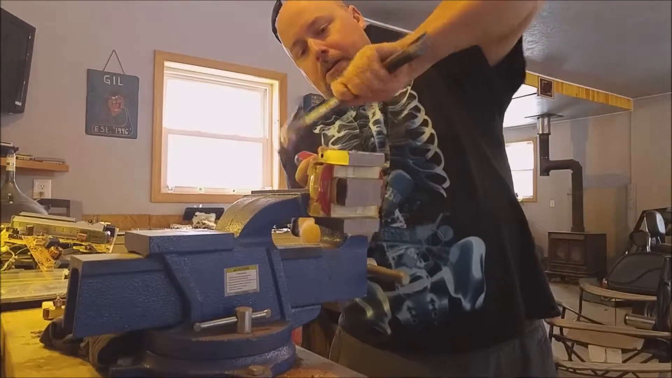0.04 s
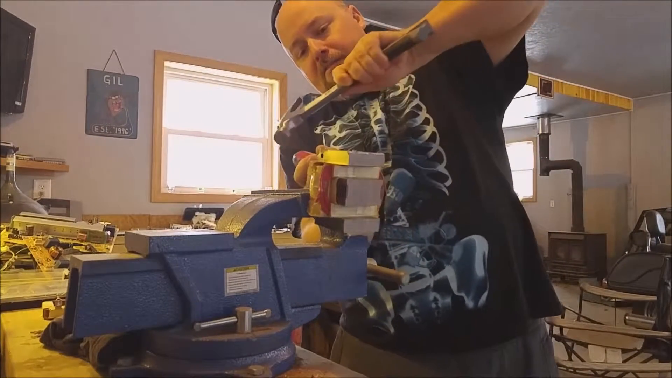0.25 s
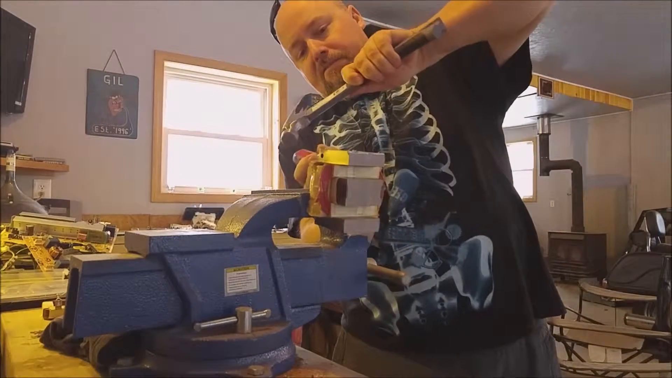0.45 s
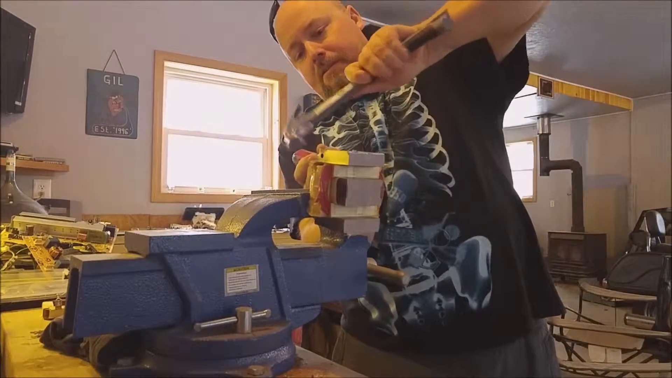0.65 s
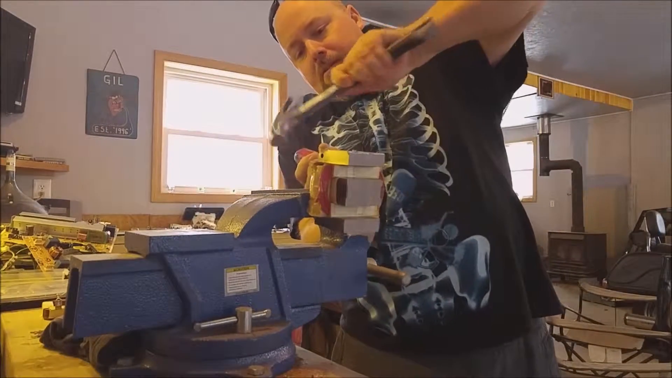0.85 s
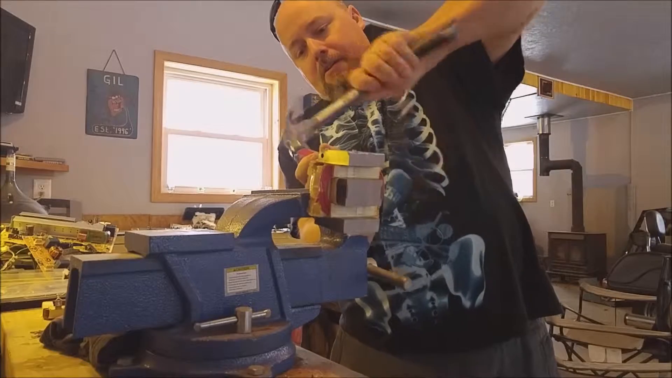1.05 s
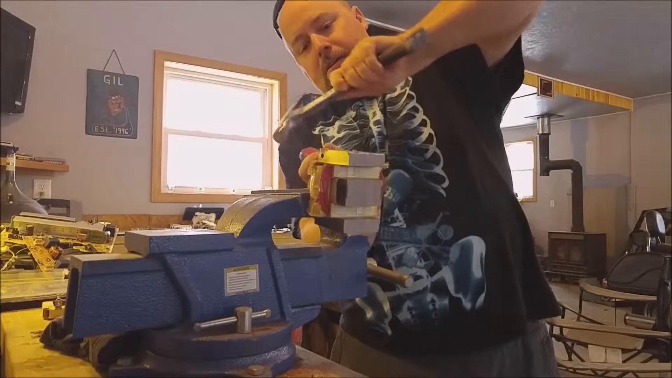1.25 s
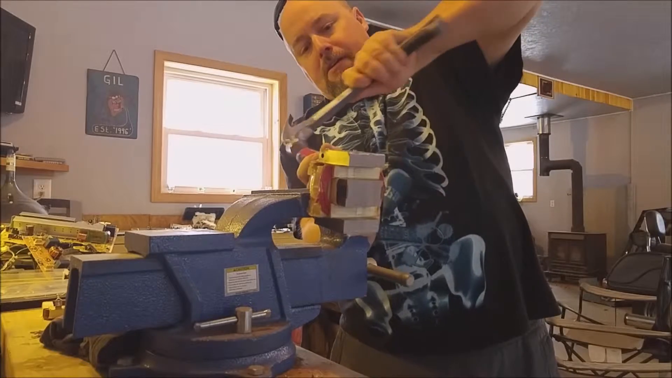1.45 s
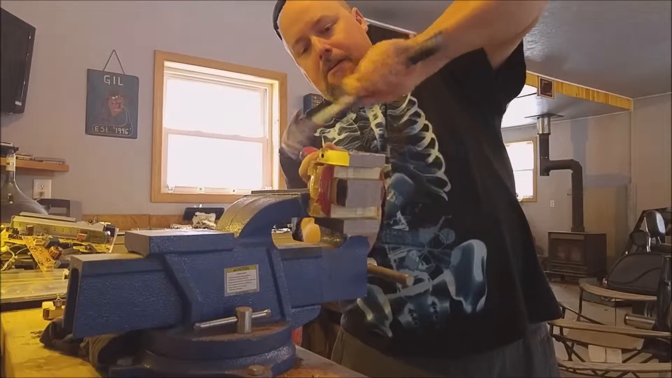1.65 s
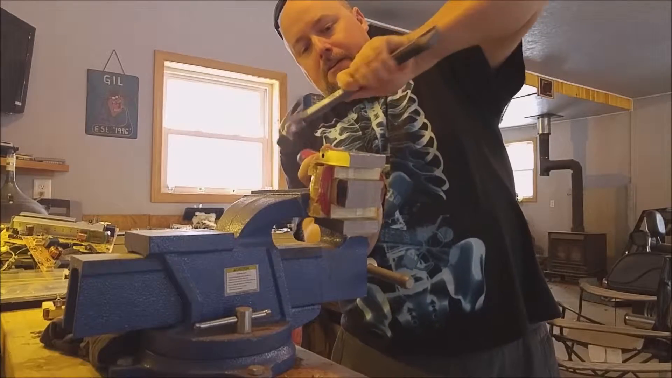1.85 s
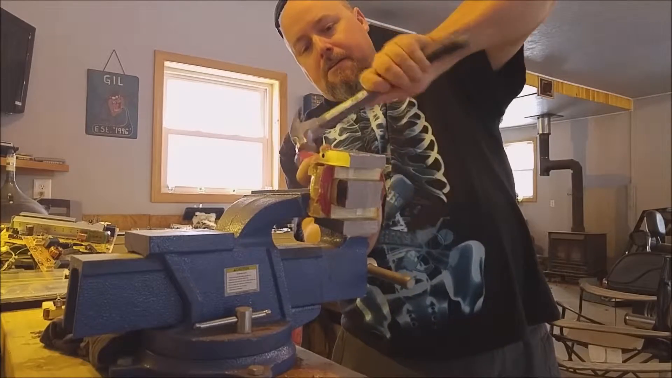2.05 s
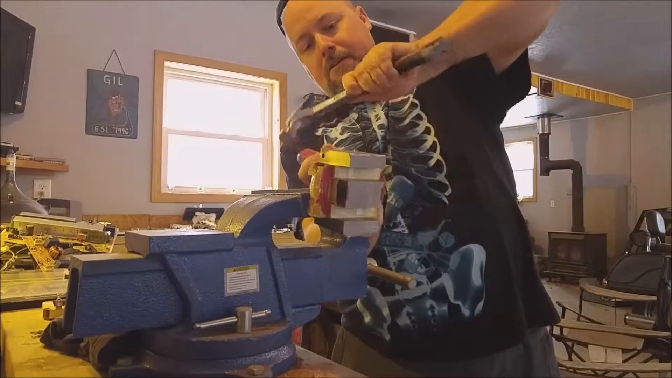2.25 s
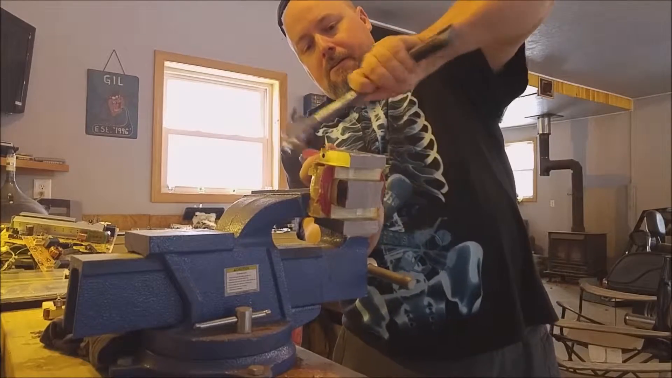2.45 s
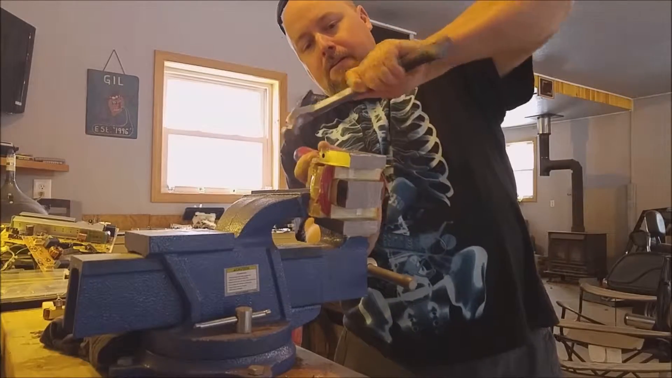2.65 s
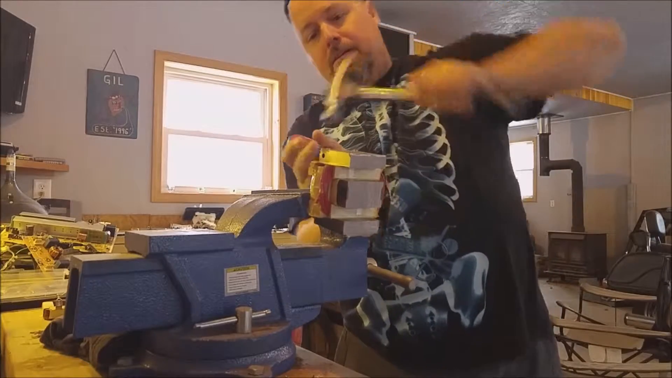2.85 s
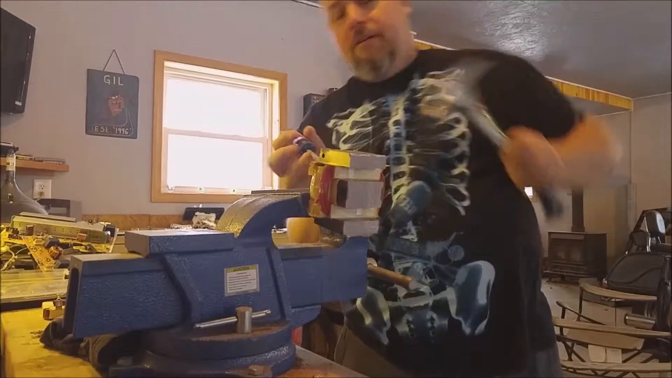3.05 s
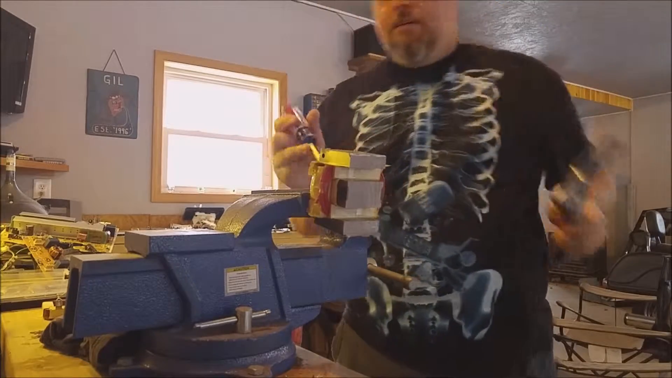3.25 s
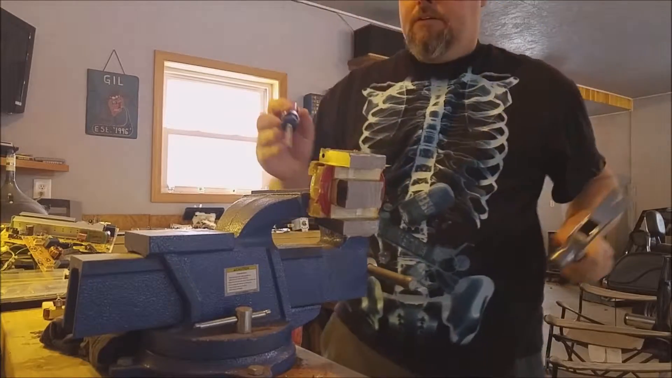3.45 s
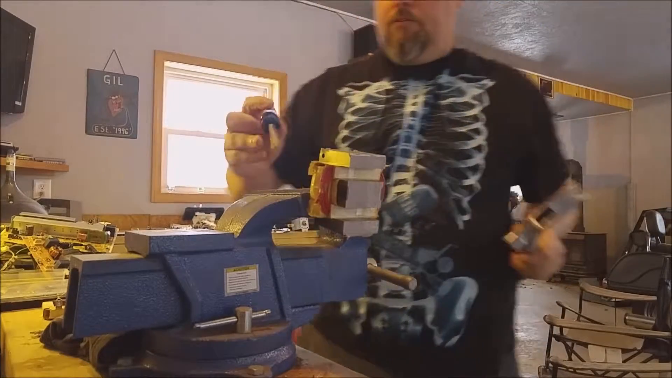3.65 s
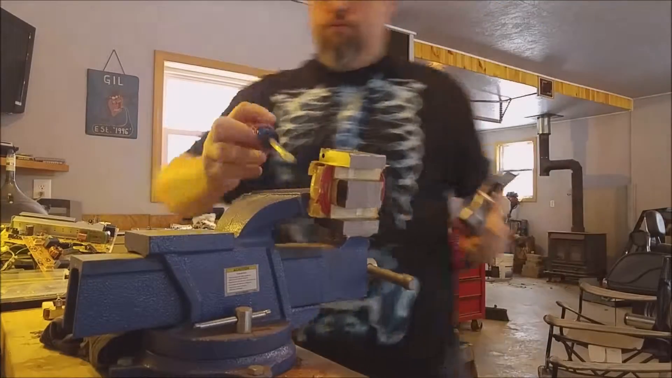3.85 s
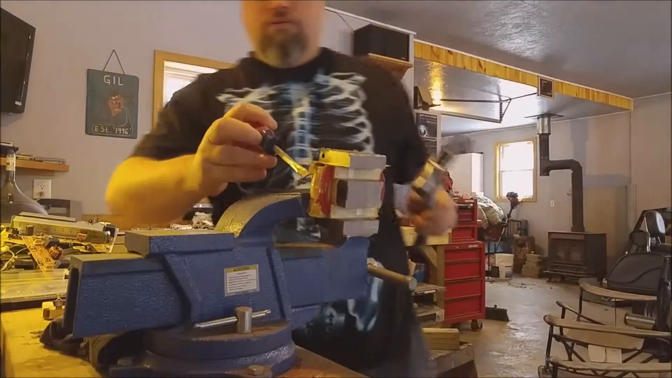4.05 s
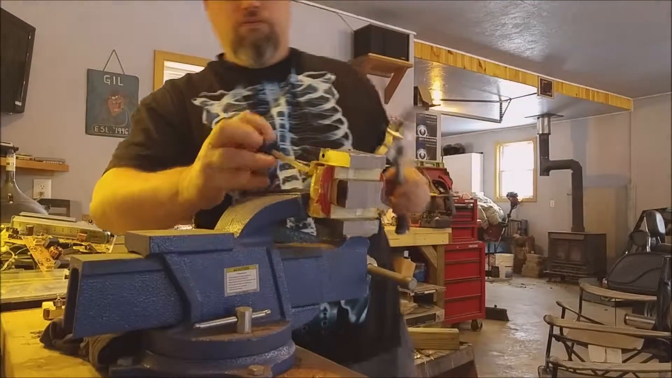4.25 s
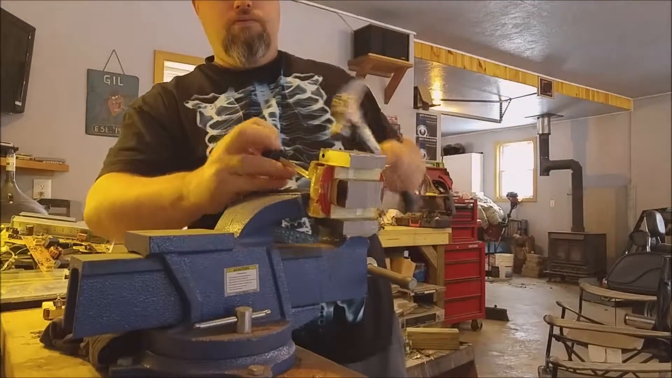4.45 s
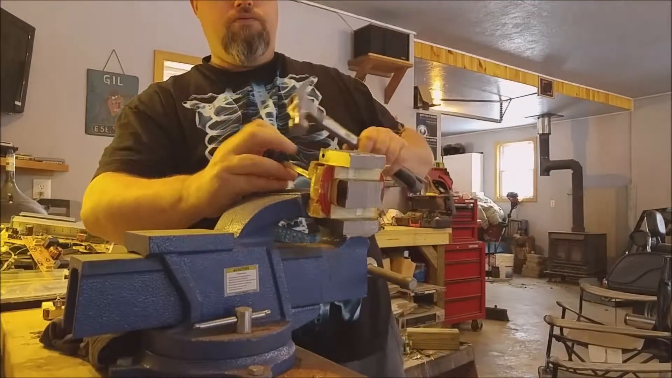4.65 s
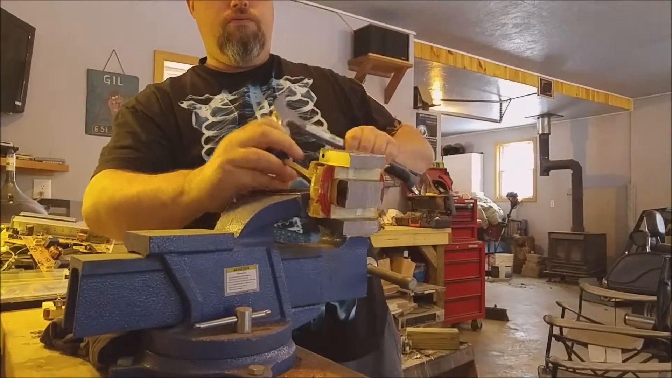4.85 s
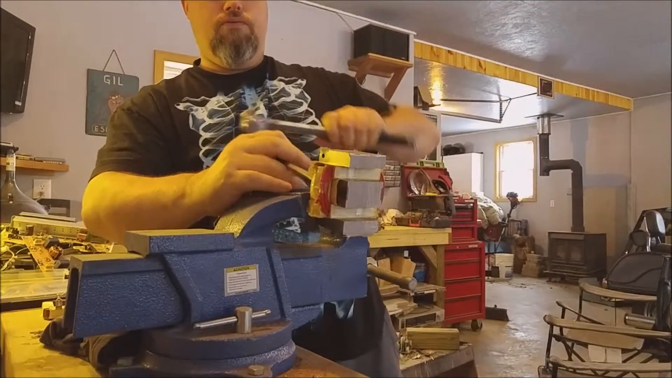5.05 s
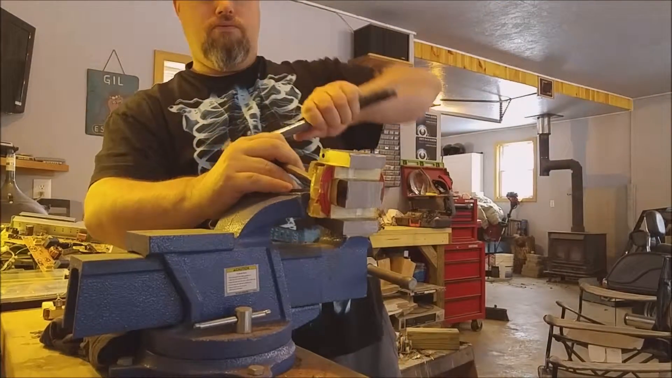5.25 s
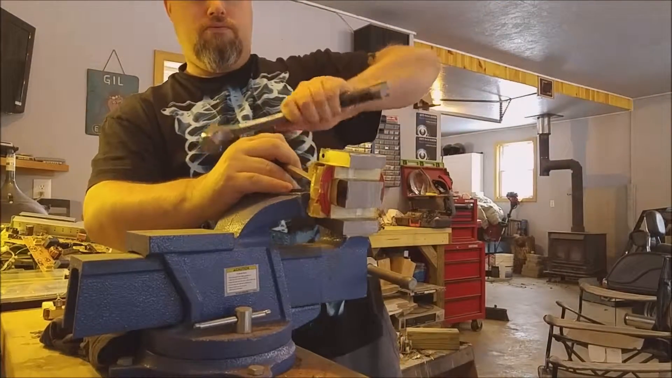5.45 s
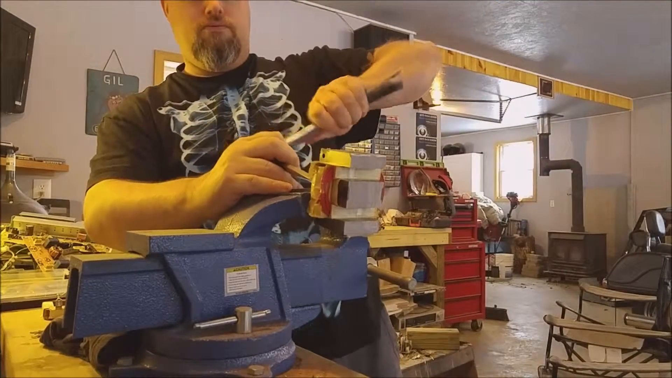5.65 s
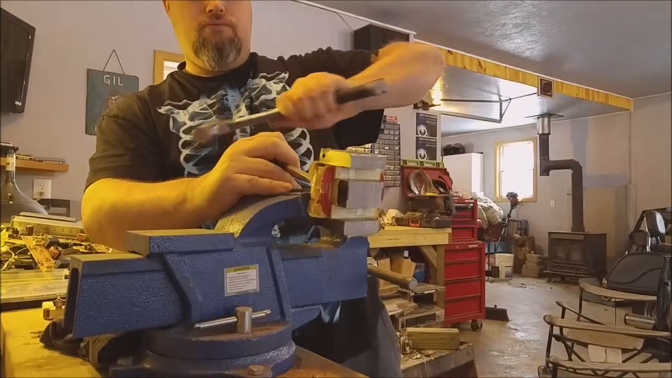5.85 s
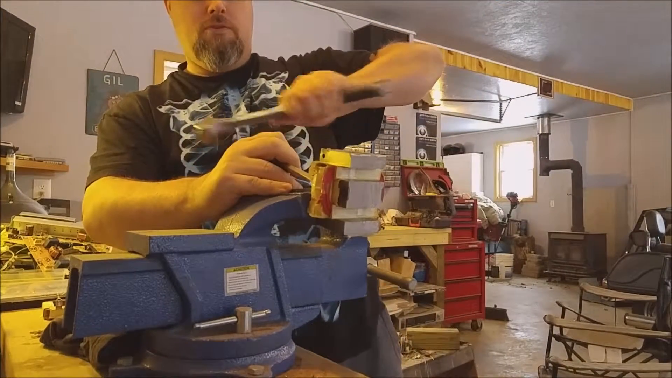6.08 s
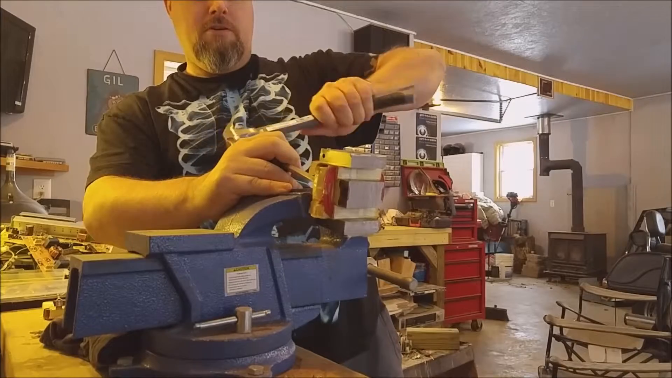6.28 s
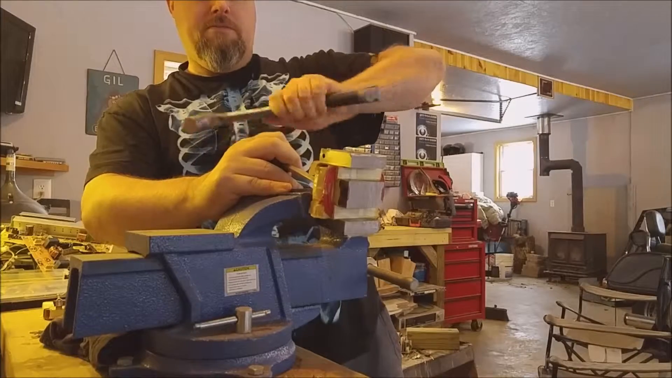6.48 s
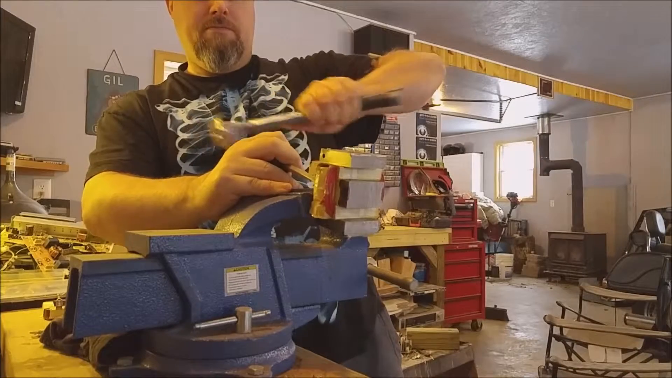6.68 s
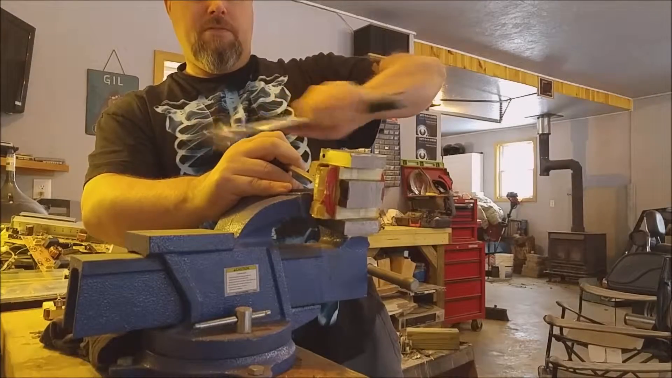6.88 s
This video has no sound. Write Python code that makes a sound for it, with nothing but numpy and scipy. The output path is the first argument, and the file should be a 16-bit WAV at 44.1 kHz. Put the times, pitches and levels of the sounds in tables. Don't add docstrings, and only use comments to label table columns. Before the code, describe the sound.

Loud, close steel-on-steel hammering with bench boom and short room echo stops for faint cloth rustle and two small clicks, then resumes with four sharper hits.

```python
import sys
import numpy as np
from scipy import signal
from scipy.fft import rfft, irfft, next_fast_len
from scipy.io import wavfile
from scipy.ndimage import uniform_filter1d

SR = 44100
rng = np.random.default_rng(int(sys.argv[2]) if len(sys.argv) > 2 else 0)


def natural_amplitude(level_db):
    exponent = np.asarray(level_db, float) / 20
    return 10 ** exponent


def master(y):
    cut = np.clip(np.atleast_2d(y).T, -1, 1)
    pcm = np.round(cut * 32767)
    wavfile.write(sys.argv[1], SR, pcm.astype(np.int16))


N = 305172
LEAD_S = 0.3
PORT_LAG = 14

# f/Hz, level/dB per Hz
CRACK = [(900, -47), (1500, -9.5), (2200, -12.5), (3400, -18), (5000, -9.5), (6100, -0.5), (7300, -2),
         (8300, -2.5), (9800, -12.5), (11000, -17.5), (13500, -13), (15500, -31), (16900, -61)]


def read(points, hz):
    f, value = np.transpose(points)
    return np.interp(np.log(hz + 1), np.log(f + 1), value)


def evened(x):
    return x / np.sqrt(np.mean(x ** 2) + 1e-20)


def add(mix, s, sound):
    part = mix[:, round((s + LEAD_S) * SR):][:, :sound.shape[1]]
    part += sound[:, :part.shape[1]]


def coloured(x, points):
    gain = natural_amplitude(read(points, np.fft.rfftfreq(x.shape[-1], 1 / SR)))
    return irfft(rfft(x) * gain, x.shape[-1])


def resonance(x, hz, width):
    return signal.lfilter(*signal.iirpeak(hz, hz / max(width, 25), SR), x)


def first_blows(hits, tails):
    # crack/dB, loudest core f/Hz, solidness of landing/dB
    earlier_blow = [
        (-0.28, -9, -4.5, 600, -23),
    ]
    blows = [
        (.056, -11.5, -7, 685, -9),
        (.893, -16, -5, 1079, 1.5),
        (1.22, -8, 3, 1080, -1),
        (1.554, -12.5, -3, 970, -4.5),
        (1.873, -13, 1.5, 1026, -2),
        (2.211, -14, -6.5, 1030, -3.5),
        (2.537, -14, -1.5, 940, -4.5),
    ]
    # f/Hz, level/dB, t60/s
    bench = [(42, -3, .3), (55.25, -4, 0.35), (66, -2, 0.27), (85.2, 0, 0.31), (109, -0.5, .25),
             (153.6, 2, 0.22)]
    # f/Hz, width/Hz, level/dB
    vise = [(272, 110, 14.5), (370, 73, 17), (623.6, 89, 14.5), (1110, 96, -11), (1636, 110, -39),
            (2470, 95, -17), (3306, 100, -12.5)]
    # f/Hz, level against the landing/dB, t60/s
    core = [(336, -12, .4), (639, -17.5, 0.4), (1395, -23, 0.067), (2540, -20.5, 0.2), (3356, -28.5, .25),
            (8150, -21, .2)]
    for k, row in enumerate(earlier_blow + blows):
        sound = blow(row, bench, vise, CRACK, core, boom_db=-5, swell_s=0.072, tail=tails[k % 6])
        add(hits, row[0], sound)


def late_blows(hits, tails):
    # crack/dB, loudest core f/Hz, solidness of landing/dB
    blows = [
        (5.777, -17, 9.5, 602, 4.5),
        (6.143, -15, 5.5, 870, -2),
        (6.475, -14.5, 5, 700, -1),
        (6.799, -12.5, -4, 681, -8),
    ]
    # f/Hz, level/dB, t60/s
    bench = [(37.3, -9, 0.23), (50, -2.5, 0.31), (64.1, -5.5, 0.36), (86, -1, 0.34), (124, -6.5, 0.34),
             (177.9, -14, 0.28)]
    # f/Hz, width/Hz, level/dB
    vise = [(253, 190, -0.5), (379, 170, 17), (671, 240, 4), (810, 160, 3), (1110, 74, -45),
            (1651, 100, -31), (2520, 520, -49)]
    # f/Hz, level/dB per Hz
    crack = [(900, -51), (1600, -11), (2300, -40.5), (3100, -26.5), (4100, -8.5), (5300, -3), (7300, 4.5),
             (8600, -2.5), (10200, -3), (12600, -15), (15300, -12), (16900, -55)]
    # f/Hz, level against the landing/dB, t60/s
    core = [(607, -15.5, 0.47), (656, -13.5, .4), (1646, -15, 0.097), (3356, -35, 0.35), (7510, -20, 0.22),
            (8126, -22, 0.14)]
    for k, row in enumerate(blows):
        sound = blow(row, bench, vise, crack, core, boom_db=-11, swell_s=0.0038, tail=tails[k + 2])
        add(hits, row[0], sound)


def blow(row, bench, vise, steel, core, boom_db, swell_s, tail):
    s, db, crack_db, core_hz, solid_db = row
    t = np.arange(SR // 2) / SR
    body = body_of(t, vise, core_hz, solid_db)
    crack = burst(t, 0.022, steel) + natural_amplitude(-7) * burst(t, 0.063, steel)
    sound = in_shop(natural_amplitude(crack_db) * crack, tail, wet_db=-8.5, blur_hz=220)
    sound += in_shop(0.74 * body, tail, wet_db=-4, blur_hz=51)
    swell = (1 - np.exp(-t / swell_s)) ** 2
    left, other = ring(bench, t, 2.5), ring(bench, t, 2.5)
    boom = swell * np.array([left, 0.4 * left + 0.4 * other])
    sound[:, :len(t)] += natural_amplitude(solid_db + boom_db + 8) * boom
    lets_go = 1 - np.exp(-t / 0.016)
    free = sum(ping((s, *mode)) for mode in core) * lets_go
    sound[:, :len(t)] += natural_amplitude(solid_db) * free
    return natural_amplitude(db) * sound


def burst(t, t60, colour):
    a, b = rng.standard_normal((2, len(t)))
    puff = evened(coloured(np.array([a + 0.8 * b, a - 1.1 * b]), colour)) * natural_amplitude(-60 * t / t60)
    return np.array([puff[0], np.roll(puff[1], PORT_LAG)])


def body_of(t, vise, core_hz, solid_db):
    # f/Hz, level/dB
    jaws = [(450, 0), (800, -0.5), (1250, 1), (1500, 0), (2000, -3.5), (2600, -3)]
    # f/Hz, likeness (0-1)
    sides_alike = [(200, 0.86), (400, .8), (700, .45), (1400, 0.89), (3000, .1)]
    spectra = []
    for _ in "lr":
        vise_knock = knock(t, vise, 0.14)
        core_knock = natural_amplitude(solid_db) * knock(t, [(core_hz, core_hz * 0.28, 0)], 0.032)
        spectra.append(rfft(coloured(vise_knock + core_knock, jaws)))
    left, other = spectra
    same = np.clip(read(sides_alike, np.fft.rfftfreq(len(t), 1 / SR)), 0, 1)
    right = same * left + np.sqrt(1 - same ** 2) * other
    fade = np.cos(np.pi / 2 * t / t[-1]) ** 2
    return irfft(np.array([left, right]), len(t)) * fade


def knock(t, peaks, t60):
    rattle = rng.standard_normal(len(t)) * natural_amplitude(-60 * t / t60)
    body = sum(natural_amplitude(db) * resonance(rattle, hz, width) for hz, width, db in peaks)
    return body / np.sqrt(np.sum(body ** 2) / 400)


def ring(modes, t, spread_db):
    hz, db, t60 = np.array(modes).T[:, :, None]
    chance = rng.standard_normal((len(hz), 3))
    turns = hz * (1 + 0.024 * chance[:, :1]) * t + chance[:, 2:]
    level_db = db + spread_db * chance[:, 1:2] - 60 * t / t60
    return (np.sin(2 * np.pi * turns) * natural_amplitude(level_db)).sum(0)


def ping(row):
    s, hz, db, t60 = row
    t = np.arange(SR // 2) / SR
    onset = 1 - np.exp(-t / 0.006)
    return np.sin(2 * np.pi * hz * t) * natural_amplitude(db - 60 * t / t60) * onset * np.ones((2, 1))


def lone_tones(hits):
    # t/s, f/Hz, level/dB, t60/s
    pings = [(.9, 1079, -22.5, 0.21), (1.236, 7990, -16, 0.29), (1.236, 8006, -24, 0.34),
             (1.586, 8600, -14.5, 0.066), (2.24, 3356, -38, 0.16), (6.5, 3355, -43, .2),
             (6.82, 3359, -35.5, 0.2), (6.83, 8200, -15.5, 0.06), (.52, 340, -52, 0.3),
             (1.24, 2556, -24, .11), (.9, 299.3, -26, .4), (5.78, 651, -23, 0.37)]
    for row in pings:
        add(hits, row[0], ping(row))


def rebounds(hits, tails):
    # t/s, level/dB, knock against it/dB, left-right/dB
    taps = [(.135, -39.5, 1, 23), (.911, -28, -16.5, 2.5), (1.256, -32, -9, 15), (1.586, -29, -10.5, 8),
            (1.909, -30.5, -6, 9), (2.243, -30.5, -5.5, 16), (2.572, -32, -7.5, 3), (5.787, -22.5, -36, 6),
            (6.51, -26.5, -6, 13), (6.832, -33.5, -14, 12), (1.241, -31, -8, 2), (1.25, -27.5, -8, 2.5),
            (1.262, -26.5, -5.5, 2)]
    for k, row in enumerate(taps):
        add(hits, row[0], in_shop(tap(row), tails[k % 6], wet_db=0, blur_hz=300))


def tap(row):
    s, db, knock_db, pan_db = row
    t = np.arange(SR // 10) / SR
    pan_db = np.clip(pan_db, -8, 8)
    body = knock(t, [(700, 230, 4.5), (1210, 470, 6.2), (2800, 1100, 1.7)], 0.039)
    touch = burst(t, 0.048, CRACK) + natural_amplitude(knock_db) * body
    return natural_amplitude(db) * touch * natural_amplitude([[pan_db / 2], [-pan_db / 2]])


def seating_taps(hits, tails):
    # knock/dB, bench thud/dB
    touches = [
        (4.3755, -19, -22.5, -36),
        (4.3985, -26, -21.5, -26.5),
        (4.6535, -19, -23.5, -40),
        (4.672, -30.5, -16.5, -17),
        (4.683, -27, -32, -25),
        (4.690, -46, -12, -28),
    ]
    for k, row in enumerate(touches):
        add(hits, row[0], in_shop(seat(row), tails[k], wet_db=-9.5, blur_hz=150))


def seat(row):
    # f/Hz, level/dB per Hz
    tip = [(1180, -60.5), (2000, -44), (4710, -7), (5440, -10), (5940, -13), (6620, -2), (7170, -5),
           (8720, 2.5), (10200, -18), (15300, -16.5), (16900, -57)]
    s, db, knock_db, thud_db = row
    t = np.arange(SR // 5) / SR
    click = burst(t, 0.014, tip)
    body = natural_amplitude(knock_db) * knock(t, [(740, 78, 5), (1185, 67, 9), (2750, 490, -4.5)], 0.058)
    thud = natural_amplitude(thud_db) * knock(t, [(154, 67, 0), (302, 180, 0)], 0.75)
    return natural_amplitude(db) * (click * natural_amplitude([[2.5], [-2.5]]) + body + thud)


def shop_tail():
    # f/Hz, t60/s
    shop_t60 = [(50, 1), (130, 0.72), (350, 0.76), (920, 0.82), (2400, 0.76), (6400, 0.66), (14000, 0.43)]
    # t/s, level/dB
    echoes = [(.004, -5.5), (.009, -11.5), (0.018, -5.5), (.027, -27), (0.045, -12), (0.082, -8)]
    # f/Hz, likeness (-1 to 1)
    likeness = [(60, 0.97), (180, 0.99), (550, 0.23), (1650, -0.16), (5000, -0.34), (15000, -.1)]
    taps = np.zeros((2, SR))
    at = np.arange(200, SR - 20, 20) + rng.integers(0, 20, (2, (SR - 201) // 20))
    np.put_along_axis(taps, at, rng.choice([-1., 1.], at.shape), 1)
    for s, db in echoes:
        taps[[0, 1], round(s * SR) + rng.integers(0, 60, 2)] += natural_amplitude(db + 16.5)
    hz, t, z = signal.stft(taps, SR, nperseg=512)
    same = np.clip(read(likeness, hz), -1, 1)[:, None]
    z = np.array([z[0], same * z[0] + np.sqrt(1 - same ** 2) * z[1]])
    dying = natural_amplitude(-60 * t / read(shop_t60, hz)[:, None])
    tail = signal.istft(z * dying, SR, nperseg=512)[1]
    return tail / np.linalg.norm(tail[0])


def in_shop(near, tail, wet_db, blur_hz):
    size = next_fast_len(near.shape[1] + tail.shape[1])
    power = abs(rfft(near[0], size)) ** 2
    colour = np.sqrt(abs(uniform_filter1d(power, int(blur_hz * size / SR) + 1)))
    wet = natural_amplitude(wet_db) * irfft(rfft(tail, size) * colour, size)[:, :tail.shape[1]]
    wet[:, :near.shape[1]] += near
    return wet


def shuffle():
    # t/s, strongest tooth of the comb f/Hz, nearness to the bench (0-1)
    stance = [(.4, 6270, 0.4), (.85, 6130, .35), (3.55, 6750, .4), (4.2, 6550, .5), (4.4, 6140, 0.3),
              (5.0, 6400, 0.83), (5.76, 6820, 1.06)]
    # f/Hz, level/dB per Hz
    rub_colour = [(300, -45), (2000, -21.5), (3200, -6), (5000, -8), (6500, -0.5), (8600, -1),
                  (10000, -8.5), (12500, -10.5), (15000, -16.5), (16300, -23), (17000, -55.5)]
    # f/Hz, level/dB per Hz
    scuff_colour = [(35, -30), (60, -1), (82, 2.5), (246, -18), (415, 4), (497, -39), (617, 2), (2220, -7),
                    (4500, -15.5), (5850, -8.5), (9900, -120)]
    t, hz = np.arange(N // 128 + 5) * 128 / SR, np.fft.rfftfreq(512, 1 / SR)[:, None]
    s, tooth_hz, near = np.transpose(stance)
    turn = 2 * np.pi * 3.25 * (hz / np.interp(t, s, tooth_hz) - 1)
    teeth = np.cos(turn) + 0.9 / 2 * np.cos(2 * turn)
    comb_db = 5 * np.interp(t, s, near) * teeth * np.exp(-(hz / 7500 - 1) ** 2 * 2)
    rub, scuff = natural_amplitude(read(rub_colour, hz) + comb_db), natural_amplitude(read(scuff_colour, hz))
    rub, scuff = rub / np.linalg.norm(rub, axis=0), scuff / np.linalg.norm(scuff)
    rubbing, scuffing = strokes(t)
    magnitude = np.sqrt(rubbing * rub ** 2 + scuffing * (scuff * natural_amplitude(5.5)) ** 2)
    rustle = hiss(magnitude, same=0.12, patchy_db=1.2)
    return natural_amplitude(1.5) * rustle * natural_amplitude([[2.2], [-2.2]])


def strokes(t):
    # start t/s, hold/s, rubbing/dB, share of low scuff/dB, fade/dB per s
    shuffles = [(0.414, 0.073, -52.5, -12.5, 101), (.6, .2, -84, 8, 20), (3.573, .01, -55, -12, 69),
                (3.864, 0.15, -54, -15, 60), (3.92, 0.16, -51.5, -11, 56), (4.098, 0.023, -50.5, -12, 45),
                (4.327, .01, -44.5, -17, 200), (4.367, 0.009, -45, -16, 104), (4.457, 0.22, -55, -13, 150),
                (4.75, 0.33, -55, -15, 13), (5.227, .03, -60.5, -27, 39), (5.36, 0.017, -54.5, -20.5, 18)]
    rise_s, from_db = 0.065, -16
    s, hold, db, low_db, fade = np.array(shuffles).T[:, :, None]
    since = t - s - rise_s
    swell_db = -from_db * np.minimum(since, 0) / rise_s
    fade_db = abs(fade) * np.maximum(since - hold, 0)
    power = natural_amplitude(2 * (db + swell_db - fade_db)) * (t < 5.762)
    return power.sum(0), (power * natural_amplitude(2 * low_db)).sum(0)


def hiss(magnitude, same, patchy_db):
    a, b, c, d, patches = rng.standard_normal((N // 128 + 5, 257, 5)).T
    patches = evened(uniform_filter1d(uniform_filter1d(patches, 8, 0), 12, 1))
    left, other = a + 1j * b, c + 1j * d
    z = np.array([left, same * left + np.sqrt(1 - same ** 2) * other])
    z = z * magnitude * natural_amplitude(patchy_db * patches)
    return signal.istft(z, nperseg=512, noverlap=384)[1][:, :N]


def camera_ticks():
    first_s, every_s = 0.4015, 0.10243
    out, t = np.zeros((2, N + SR)), np.arange(200) / SR
    click = burst(t, 0.005, [(3500, -30), (5500, 0), (8000, 2), (16000, -10)])
    for s in np.arange(first_s - 3 * every_s, N / SR, every_s):
        add(out, s - LEAD_S, natural_amplitude(-52 + 1.2 * rng.standard_normal()) * click)
    return out[:, :N]


def quiet():
    # f/Hz, level/dB per Hz
    floor = [(15, -46), (25, 2.5), (80, -5.5), (277, -7.5), (416, 1.5), (516, -23), (1650, -11),
             (2480, -20), (3520, -12), (4250, -17), (8360, -13), (14000, -25.5), (16000, -34)]
    # f/Hz, level/dB
    hums = [(54, -80), (420, -77), (646, -93), (1179, -94), (1244, -93), (3558, -90), (8382, -86)]
    air = evened(coloured(rng.standard_normal((2, N)) + 0.3 * rng.standard_normal(N), floor))
    t = np.arange(N) / SR
    waver = 1 + 0.35 * evened(uniform_filter1d(rng.standard_normal((len(hums), N)), 4000))
    hz, db = np.array(hums).T[:, :, None]
    humming = (natural_amplitude(db + 1) * waver * np.sin(2 * np.pi * hz * t)).sum(0)
    return natural_amplitude(-75.5 + 2.5) * air + humming


def scene():
    # f/Hz, left-right/dB
    lean = [(40, 3), (80, 0), (150, 1), (380, 2), (800, -.4), (1500, 1), (3000, .3), (6000, 1.8),
            (10000, 3), (14000, 0)]
    hits = np.zeros((2, N + round(LEAD_S * SR)))
    tails = [shop_tail() for _ in range(6)]
    first_blows(hits, tails)
    late_blows(hits, tails)
    rebounds(hits, tails)
    seating_taps(hits, tails)
    lone_tones(hits)
    left = coloured(hits[0, -N:], [(hz, db / 2) for hz, db in lean])
    right = coloured(hits[1, -N - 2:-2], [(hz, -db / 2) for hz, db in lean])
    return np.array([left, right]) + shuffle() + quiet() + camera_ticks()


def starved(x, under_db, from_hz, thin_db, wander_db):
    hz, t, z = signal.stft(x, SR, nperseg=1024)
    power = (abs(z) ** 2).mean(0)
    bands = power[:512].reshape(64, 8, -1).sum(1)
    whim = rng.standard_normal(bands.shape)
    whim = evened(uniform_filter1d(uniform_filter1d(whim, size=12), size=2, axis=0))
    weak = bands < bands[7:].sum(0) * natural_amplitude(2 * (wander_db * whim - thin_db))
    band_hz = hz[:512:8, None]
    keep = (bands > power.sum(0) * natural_amplitude(-2 * under_db)) | (band_hz < from_hz)
    keep &= ~weak | (band_hz < 2400)
    z[:, :512] *= np.repeat(keep, 8, 0)
    return signal.istft(z, SR, nperseg=1024)[1][:, :N]


def low_pass(x):
    return signal.sosfilt(signal.butter(12, 17040, fs=SR, output="sos"), x)


def record(dry):
    power_db = 10 * np.log10(abs(uniform_filter1d((dry ** 2).mean(0), 300)) + 1e-12)
    fall = np.arange(N) * 24 / SR
    peak_db = np.maximum.accumulate(power_db + fall) - fall
    over_db = np.maximum(peak_db + 18, 0)
    limited = dry / natural_amplitude(0.35 * uniform_filter1d(over_db, 150))
    held = 0.35 * np.tanh(limited / 0.35)
    edged = signal.oaconvolve(held, signal.firwin(255, 16700, fs=SR)[None], "same")
    edged = signal.sosfilt(signal.butter(N=2, Wn=42, btype="high", fs=SR, output="sos"), edged)
    mix = starved(edged, under_db=45, from_hz=9400, thin_db=30, wander_db=5.2)
    return low_pass(mix)


dry = scene()
out = record(dry)
master(out)
```